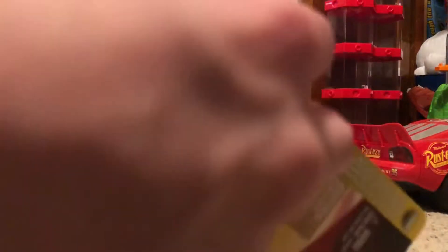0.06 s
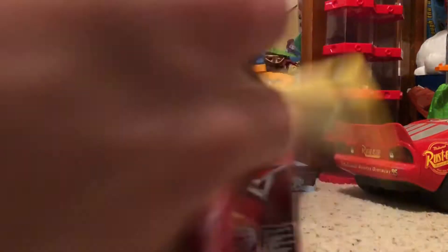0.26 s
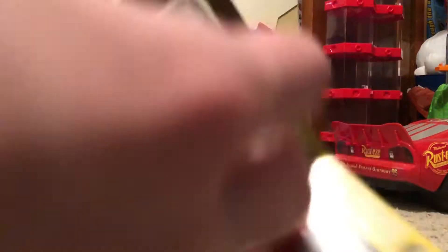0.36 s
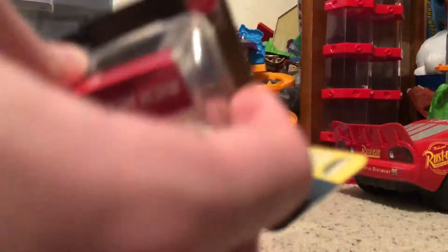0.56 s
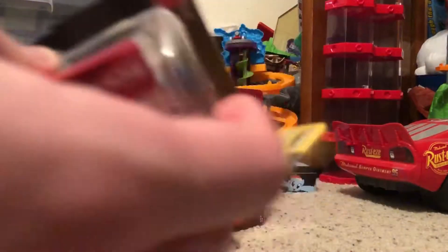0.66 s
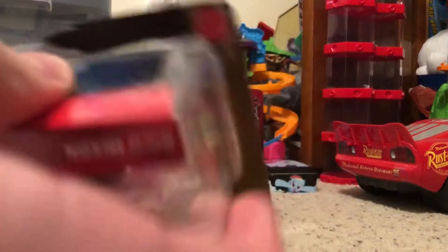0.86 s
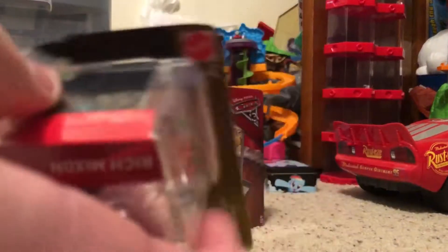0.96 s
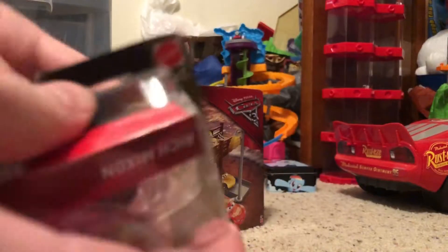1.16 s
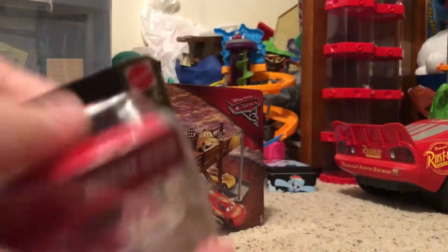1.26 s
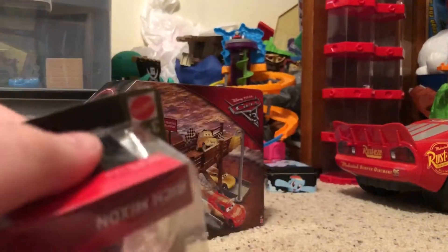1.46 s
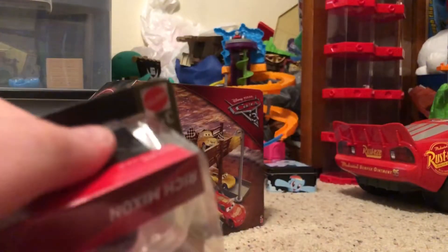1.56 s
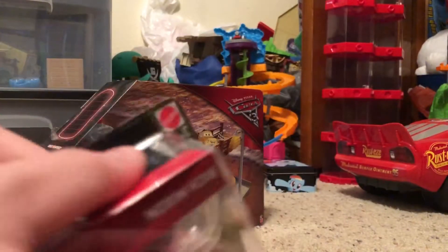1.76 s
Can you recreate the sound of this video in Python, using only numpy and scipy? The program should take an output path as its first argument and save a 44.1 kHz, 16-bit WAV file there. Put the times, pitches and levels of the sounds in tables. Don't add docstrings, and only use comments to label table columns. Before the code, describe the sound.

Plastic blister pack ripped off its cardboard card with loud crackles, then small handling creaks indoors

```python
import sys
import numpy as np
from scipy import signal
from scipy.fft import rfft, irfft, next_fast_len
from scipy.io import wavfile
from scipy.ndimage import uniform_filter1d, map_coordinates

SR = 44100
rng = np.random.default_rng(int(sys.argv[2]) if len(sys.argv) > 2 else 0)


def generate_wav(signal):
    frames = np.transpose(np.atleast_2d(signal))
    scaled = np.clip(frames, -1, 1) * 32767
    pcm = np.round(scaled).astype(np.int16)
    wavfile.write(sys.argv[1], SR, pcm)


def natural_amplitude(level_db):
    exponent = np.asarray(level_db, float) / 20
    return 10 ** exponent


N = 79380


def unit(x):
    return x / np.sqrt(np.mean(x ** 2) + 1e-20)


def filtered(x, response):
    m = next_fast_len(N + 8192)
    return irfft(rfft(x, m) * response(np.fft.rfftfreq(m, 1 / SR)), m)[:N]


def colour(points):
    f, v = np.transpose(points)
    return lambda hz: natural_amplitude(np.interp(np.log(hz + 1), np.log(f + 1), v))


def wobble(rate):
    knots = rng.standard_normal(int(N * rate / SR) + 4)
    return map_coordinates(knots, [np.arange(N) * rate / SR])


def resonance(f, centre, width):
    return 1j * f * width / (centre * centre - f * f + 1j * f * width)


# pitch in Hz, width in Hz, level in dB.
BUBBLE_NOTES = [(424, 330, -5.5), (1354, 384, 0), (2070, 670, -3.5), (3210, 1240, -9.5),
                (5420, 2940, -16.5)]


def bubble(f):
    total = 0
    for k, (hz, width, db) in enumerate(BUBBLE_NOTES):
        total = total + (-1) ** k * natural_amplitude(db) * resonance(f, hz, width)
    return total


def fibres(per_s):
    breaks = (rng.random(N) < per_s / SR) * rng.standard_normal(N)
    size = natural_amplitude(1.2 * rng.exponential(size=N))
    clumps = natural_amplitude(1.6 * (wobble(300) + 0.33 * wobble(69.5)))
    return unit(breaks * size * clumps)


def patchy(x):
    z = signal.stft(x, nperseg=128)[2]
    spots = uniform_filter1d(rng.standard_normal(z.shape), size=3, axis=0)
    spots = uniform_filter1d(spots, size=3, axis=1)
    spot_db = 2.5 * unit(spots)
    return unit(signal.istft(z * natural_amplitude(spot_db), nperseg=128)[1][:N])


# start in seconds, # length in seconds,
# pull at the start in dB, pull at the end in dB, hollowness in dB.
PULL_STROKES = [(0, 0.071, -49.5, -70.5, 14.5), (0.019, 0.036, -68, -59.5, 20.5),
                (0.05, 0.068, -47, -66, -15), (0.116, 0.16, -62, -42, -5), (0.231, 0.035, -24, -20, 3.5),
                (0.269, 0.05, -22, -22.5, 2), (0.322, 0.051, -50, -56, 18.5), (0.367, 0.007, -38.5, -16, -4),
                (0.387, 0.043, -49, -69, -6), (0.404, 0.008, -36, -28, 10.5), (0.432, 0.053, -85, -56.5, 24),
                (0.498, 0.05, -46.5, -36, 7.5), (0.559, 0.042, -47, -48, 10), (0.574, 0.0398, -40, -35, -1),
                (0.606, 0.072, -46, -41.5, 1), (0.648, 0.011, -41.5, -33, -8),
                (0.675, 0.048, -41.5, -37, -1), (0.728, 0.012, -32.5, -18.5, -7),
                (0.743, 0.038, -48, -34, 4), (0.787, 0.081, -56.5, -73, 21),
                (0.882, 0.019, -54, -43.5, 13), (0.909, 0.038, -57, -66.5, 5), (0.96, 0.013, -42, -65, 16),
                (0.98, 0.02, -52, -48.5, 7.5), (1.002, 0.026, -75, -55.5, 15.5),
                (1.05, 0.097, -71.5, -76, 22.5), (1.154, 0.027, -37, -50, 17.5),
                (1.186, 0.06, -51, -67, 16.5), (1.25, 0.012, -51.5, -68.5, 17),
                (1.267, 0.01, -63, -52.5, 15), (1.288, 0.024, -54, -58.5, 14),
                (1.327, 0.065, -56.5, -71, 9), (1.378, 0.058, -61.5, -63.5, 15),
                (1.414, 0.013, -54.5, -57, 15), (1.435, 0.071, -75.5, -73, 15.5),
                (1.527, .057, -50, -40, 4), (1.588, 0.025, -50.5, -81, 9), (1.67, .028, -75.5, -76, 23.5),
                (1.695, 0.026, -57.5, -57.5, 9.5), (1.732, 0.057, -72, -62.5, 20)]
# frequency in Hz, level in dB per Hz.
FIBRE_COLOUR = [(1500, -12.5), (2800, -3), (5000, -2.5), (9000, -4), (15500, -8)]


def tearing():
    grip_s, let_go_s = 0.001, 0.0037
    t, pull, hollow = np.arange(N) / SR, np.zeros(N), np.zeros(N)
    for start, length, start_db, end_db, hollow_db in PULL_STROKES:
        u = t - start
        edges = np.clip(u / grip_s + 1, 0, 1) * np.exp(-np.clip(u - length, 0, None) / let_go_s)
        stroke = edges * natural_amplitude(np.interp(u, [0, length], [start_db, end_db]))
        pull = np.maximum(pull, stroke)
        hollow = np.maximum(hollow, stroke * natural_amplitude(hollow_db))

    def through(breaks, force, response):
        return filtered(breaks * force, response) / np.std(filtered(breaks, response))

    def low(f):
        return resonance(f, 190, 330) ** 2

    hiss, knocks = patchy(fibres(20000)), patchy(fibres(10000))
    card = through(hiss, pull, colour(FIBRE_COLOUR))
    return card + natural_amplitude(-2) * through(knocks, hollow, bubble) + natural_amplitude(-13) * through(knocks, hollow, low)


# time in seconds, peak in dB, pitch in Hz, bright edge in dB.
RIP_SNAPS = [(0.0004, -20.5, 1420, -51), (0.083, -40, 6400, 0.5), (0.1412, -38.5, 1483, -2),
             (0.1787, -30.5, 830, -4.5), (0.2328, -10.5, 1450, -1), (0.2552, -1, 1310, -9.5),
             (0.2864, -12.5, 1750, -15), (0.3027, -10, 1340, -16), (0.3222, -15, 1430, 3),
             (0.3701, -1.5, 3620, -9.5), (0.3971, -15, 1740, -18), (0.487, -18, 1580, -16.5),
             (0.5275, -12.5, 1800, -4), (0.607, -22.5, 1730, -1), (0.7766, -17.5, 1660, -30)]
# time in seconds, peak in dB, pitch in Hz, bright edge in dB.
PEEL_TICKS = [(0.8005, -34, 1750, -34), (0.8197, -11, 3230, -23.5), (0.855, -21.5, 4200, -27),
              (0.8877, -21, 1840, -12.5), (0.898, -37, 1550, -13), (0.932, -61, 2180, 16),
              (0.9561, 2, 2120, -23.5), (0.9634, -37, 1950, -17), (0.996, -17, 2570, -13.5),
              (1.0237, -9, 2740, -30), (1.0492, -24, 2420, -27), (1.0699, -14, 2530, -36),
              (1.097, -29, 3140, -32), (1.1534, -12, 1740, -44), (1.228, -30.5, 1590, -6),
              (1.2455, -15, 1610, -32), (1.274, -27.5, 1650, -5.5), (1.3409, -19, 1850, -31)]
# time in seconds, peak in dB, pitch in Hz, bright edge in dB.
LAST_CREAKS = [
    (1.4192, -21, 1650, -23),
    (1.478, -31, 1440, -29),
    (1.526, -32, 4000, -21),
    (1.6942, -27.5, 1730, -11),
    (1.7776, -27.5, 1450, -25),
]


def snaps():
    edge_s, rise_s, edge_tilt = 0.004, 0.0011, 0.45
    out, kicks, t = np.zeros(N + SR), np.zeros(N + SR), np.arange(1000) / SR
    burst = natural_amplitude(-60 * t / edge_s) * (1 - np.exp(-t / rise_s))
    for table, cycles in ((RIP_SNAPS, 17.2), (PEEL_TICKS, 6), (LAST_CREAKS, 17.2)):
        for start, db, hz, edge_db in table:
            r, noise = rng.standard_normal(2), rng.standard_normal((2, len(t)))
            ring = 0
            for gain, ratio in ((1, 1), (0.7, 1.5 + 0.15 * r[0]), (0.6, 2.3 + 0.25 * r[1])):
                ring = ring + gain * np.sin(2 * np.pi * hz * ratio * t) * natural_amplitude(-60 * t * hz * ratio / cycles)
            ring = ring * (1 - np.exp(-t * hz))
            even = np.linalg.norm(burst) / np.linalg.norm(noise * burst, axis=1)
            edge = signal.lfilter([1, 0, -1], [1, -edge_tilt], noise[0]) * burst * even[0]
            i = max(round(start * SR), 0)
            out[i:i + len(t)] += natural_amplitude(db) * (ring + natural_amplitude(edge_db + 11) * edge)
            kicks[i:i + len(t)] += natural_amplitude(db - 5.5) * noise[1] * burst * even[1]
    return out[:N] + filtered(kicks[:N], bubble)


# time in seconds, peak in dB, pitch in Hz, length in cycles.
CREASE_POPS = [(0.037, -23.5, 1460, 5), (0.117, -49, 1500, 5.9), (.1785, -28.5, 1040, 2),
               (.531, -22, 790, 2.9), (.546, -21, 980, 3.1), (0.2331, -4.5, 1410, 3.8),
               (0.2429, -5, 1660, 1.8), (0.258, -4.5, 1335, 7.7), (.267, -6, 1970, 2.9),
               (0.287, -0.5, 3820, 1.1), (.2975, -17, 1420, 4), (0.3037, -4, 1620, 2.8),
               (.3036, -13.5, 3240, 12), (.315, -11.5, 4900, 8.7), (0.3211, -16, 8430, 20),
               (.355, -29, 1790, 5.4), (0.359, -28, 1700, 7.6), (0.3699, -13.5, 1480, 5),
               (.4095, -13.5, 1250, 2.8), (.4105, -24, 4740, 11), (0.956, -3.5, 3340, 1.66),
               (0.9612, -27, 6530, 11), (.991, -44, 6700, 20), (1.0025, -34, 6250, 9.8),
               (1.032, -34, 3600, 2.9), (1.075, -40, 5750, 6.4), (1.1564, -18, 2700, 3.4),
               (1.166, -29, 5600, 14), (1.1765, -41, 1180, 7), (1.1985, -30, 1230, 7.7),
               (1.2055, -35.5, 3350, 5.7), (1.214, -31, 1620, 3.6), (1.249, -39, 3900, 7.7),
               (1.273, -30, 1120, 3.1), (1.295, -40, 1420, 3), (1.3079, -35, 1690, 5),
               (1.3826, -42.5, 1600, 6.9), (1.4193, -31, 2160, 10.5), (1.4205, -39, 3130, 11),
               (1.4554, -45, 1610, 5), (1.6784, -37, 1700, 3), (1.694, -26.5, 5780, 4.9),
               (1.6987, -40, 6600, 18), (1.719, -47, 1970, 6.7), (1.759, -52, 1500, 4),
               (1.777, -35, 1260, 4.5), (1.799, -35, 2200, 2.1)]


def pops():
    out, t = np.zeros(N + SR), np.arange(1000) / SR
    for start, db, hz, cycles in CREASE_POPS:
        u, i = 4 * t * hz / cycles, round(start * SR)
        out[i:i + len(t)] += natural_amplitude(db) * u * np.exp(1 - u) * np.sin(2 * np.pi * hz * t)
    return out[:N]


# time in seconds, level in dB, pitch in Hz, seconds to die by 60 dB.
PACK_FLEXES = [(.0, -23, 437, 0.015), (0.04, -25.5, 494, 0.03), (0.044, -30.5, 171, 0.075),
               (.178, -25.5, 600, 0.016), (0.238, -12, 396.3, 0.074), (0.249, -19, 136, 0.063),
               (0.316, -20, 200, 0.043), (.365, -14, 186.8, 0.084), (0.374, -11, 121.4, 0.06),
               (0.433, -29, 72.7, 0.45), (0.477, -34, 203, 0.068), (.529, -16.5, 272, 0.046),
               (0.542, -15.5, 182.5, 0.029), (0.74, -17, 344.5, 0.039), (0.778, -22.5, 425, 0.025),
               (0.957, -26.5, 607, 0.059), (0.968, -35, 113.8, 0.31), (1.031, -33.5, 98.8, 0.22),
               (0.748, -29, 120, 0.13), (1.156, -24.5, 483, 0.015), (1.163, -25, 147.4, 0.061),
               (1.245, -38, 367.3, 0.18), (1.478, -38.5, 535, 0.023), (1.483, -45, 110.4, 0.12),
               (1.584, -36, 461, 0.05), (1.695, -36.5, 434, 0.021),
               (0.3831, -12.5, 67, 0.13),
    (.55, -22, 87, 0.045),
    (1.07, -33.5, 713, 0.02),
    (1.073, -37, 324, 0.037),
    (1.169, -39, 81, 0.095),
    (1.254, -32, 436, 0.046),
    (1.31, -39, 610, 0.027),
    (1.341, -47.5, 69, 0.15),
    (1.69, -52, 110, 0.16),
]


def flexes():
    sag, rise_s, rough, waver_hz = 0.278, 0.0021, 0.74, 120
    out = np.zeros(N + SR)
    for start, db, hz, t60 in PACK_FLEXES:
        t = np.arange(int(SR * min(t60, 1 / 3))) / SR
        u, i = t / t60, max(round(start * SR), 0)
        spot = t * waver_hz * np.sqrt(hz / 200)
        waver = [map_coordinates(k, [spot]) for k in rng.standard_normal((2, 128))]
        turns = hz * t60 * (u - sag * (u - (1 - np.exp(-3 * u)) / 3))
        turns = turns + rough * waver[0] / (2 * np.pi)
        tone = np.sin(2 * np.pi * turns)
        tone += 0.5 * np.sin(2 * np.pi * 1.7 * turns + 2 * waver[1])
        tone += 0.29 * np.sin(2 * np.pi * 2.9 * turns - 2 * waver[0])
        thump = natural_amplitude(-60 * u) * (1 - np.exp(-t / rise_s)) * (1 + rough * waver[1]) * tone
        out[i:i + len(t)] += natural_amplitude(db + 1.5) * thump / np.abs(thump).max()
    return out[:N]


def room(x):
    t = np.arange(SR // 4) / SR
    tail = signal.lfilter([1], [1, -0.5], rng.standard_normal(len(t))) * natural_amplitude(-60 * t / 0.14)
    delayed = np.pad(x, (150, 0))
    return signal.fftconvolve(delayed, tail / np.linalg.norm(tail))[:N]


# frequency in Hz, level in dB per Hz.
BACKGROUND_COLOUR = [(30, -7), (100, 0.5), (450, -10), (1400, -19), (3000, -27.5), (16000, -36.5)]


def background():
    return natural_amplitude(-57 + wobble(15.9)) * unit(filtered(rng.standard_normal(N), colour(BACKGROUND_COLOUR)))


def scene():
    pack = tearing() + snaps() + pops()
    return (pack + flexes() + natural_amplitude(-18.5) * room(pack) + background())[None]


def low_pass(x):
    return signal.sosfilt(signal.butter(12, 16840, fs=SR, output="sos"), x)


def record(dry):
    limited = dry[0] / (1 + np.abs(dry[0] / 1.05) ** 4) ** (1 / 4)
    heard = filtered(limited, lambda f: (1j * f / (38 + 1j * f)) ** 2 / (1 + (f / 15900) ** 80))
    return low_pass(heard[None])


dry = scene()
out = record(dry)
generate_wav(out)
```